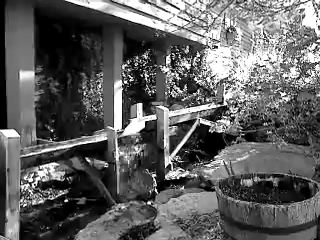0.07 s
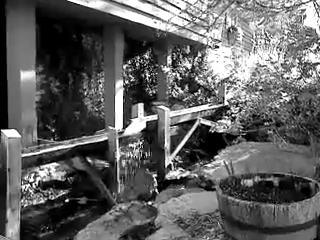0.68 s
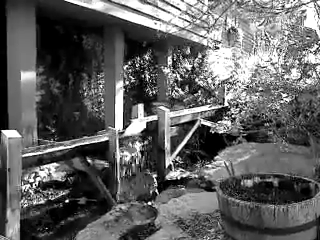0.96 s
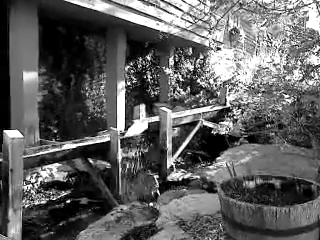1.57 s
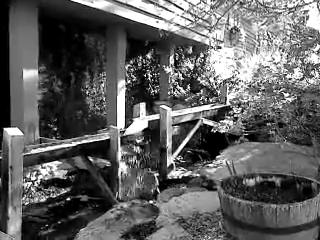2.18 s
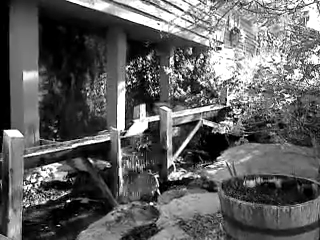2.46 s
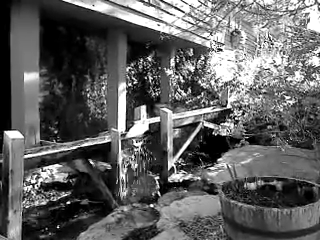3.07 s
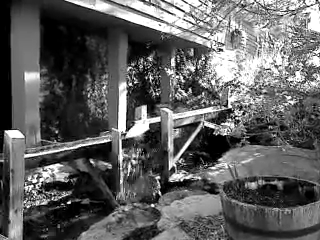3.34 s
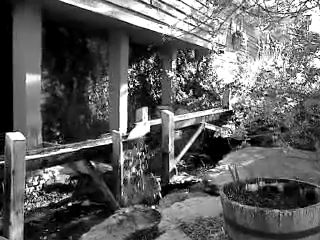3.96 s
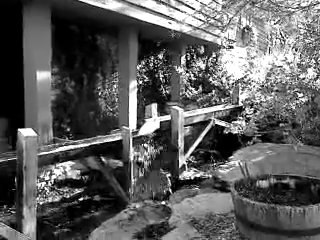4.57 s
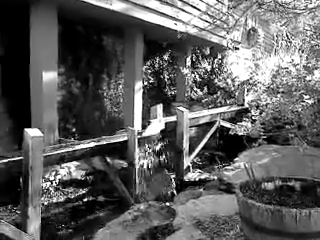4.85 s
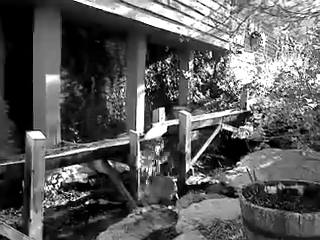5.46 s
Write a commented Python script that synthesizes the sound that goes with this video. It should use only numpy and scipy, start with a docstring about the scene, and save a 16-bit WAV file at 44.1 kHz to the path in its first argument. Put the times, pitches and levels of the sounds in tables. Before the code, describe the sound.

A steady, bright splashing of water falling onto stone and into a small pool, with scattered plinks and gurgles.

```python
"""A bright, steady spatter of water on rocks, pouring off the end of a wooden flume outdoors.
The sheet tears into lumps whose drops slap the stone; trapped air rings as bubbles in the runoff
and as low gulps in the pool. Behind it all the trough rumbles faintly.
Heard from a few metres away, on a small mono microphone with a bright resonance."""
import sys
import numpy as np
from scipy import signal
from scipy.fft import rfft, irfft
from scipy.io import wavfile
from scipy.ndimage import map_coordinates

SR = 44100
rng = np.random.default_rng(int(sys.argv[2]) if len(sys.argv) > 2 else 0)


def wav_record(signal):
    """Record a signal, one row per channel, as 16-bit PCM in the file named by sys.argv[1]."""
    frames = np.transpose(np.atleast_2d(signal))
    bounded = np.clip(frames, -1, 1)
    # unit amplitude maps onto the largest positive 16-bit level
    quanta = np.round(bounded * 32767).astype(np.int16)
    wavfile.write(sys.argv[1], SR, quanta)


N = 252693
TIME = np.arange(N) / SR


# Tone of the spatter on the rocks below the flume: (frequency [Hz], relative level [dB])
SPATTER_SPECTRUM = [(150, -32), (700, -15.5), (2000, -4.5), (2700, -10), (3050, -3), (3500, -1.5),
                    (4000, -3), (4550, 2), (5000, 1.5), (6000, -0.5), (6850, -3.5), (7400, -12),
                    (8100, -21), (9000, -36)]

def spatter(lumps, volleys, impacts):
    """Drops crack on bare stone, tiny bubbles fizz and each volley throws up a puff of fine spray."""
    fizz = bubbles(lumps ** 2, per_s=1800, low_hz=2744, high_hz=7350, cycles=26.4, rise=0.059)
    spray = volleys * rng.standard_normal(N)
    return coloured(impacts + from_db(-5.5) * fizz + from_db(0.5) * spray, SPATTER_SPECTRUM)


def drops(flow, per_s, spread_db):
    """Drops strike the rocks: many small clicks and a few large ones; rms 1."""
    sizes = from_db(spread_db * np.minimum(rng.exponential(1, N), 4))
    polarity = rng.choice([-1, 1], N)
    landing = rng.random(N) < per_s / SR
    return unit_rms(sizes * polarity * flow * landing)


# Tone of the water running off the rocks: (frequency [Hz], relative level [dB])
RUNOFF_SPECTRUM = [(200, -34), (480, -9), (570, -8), (650, -3.5), (820, -1), (1000, -2), (1300, 2.5),
                   (1580, -0.5), (1830, 3), (2250, -1), (2700, -5.5), (3600, -40), (6000, -48)]

def runoff(lumps, impacts):
    """The film of water on the rocks bubbles, washes softly and is slapped by the drops."""
    ringing = bubbles(lumps, per_s=2000, low_hz=519, high_hz=2910, cycles=15.5, rise=0.11, spread_db=0.5)
    wash = rng.standard_normal(N)
    return coloured(ringing + from_db(6) * impacts + from_db(1.5) * wash, RUNOFF_SPECTRUM)


def bubble(hz, cycles, rise):
    """Trapped air rings, fading 60 dB over `cycles`; its pitch climbs as it nears the surface."""
    age = np.arange(int(cycles * SR / hz)) * hz / SR / cycles   # 0 to 1
    phase = 2 * np.pi * cycles * (age + rise * age ** 2 / 2)
    return from_db(-60 * age) * np.sin(phase)


def bubbles(flow, per_s, low_hz, high_hz, cycles, rise, spread_db=0):
    """Bubbles of all sizes, born more often when more water lands; rms 1."""
    out = np.zeros(N)
    chance = rng.random((int(per_s * N / SR), 4))
    births = np.interp(chance[:, 0], np.cumsum(flow) / np.sum(flow), TIME)
    for s, (_, pitch, strength, side) in zip(births, chance):
        hz = low_hz * (high_hz / low_hz) ** pitch
        height = np.sqrt(hz) * from_db(spread_db * min(-np.log(1 - strength), 4))
        add(out, s, np.sign(side - 0.5) * height * bubble(hz, cycles, rise))
    return unit_rms(out)


# Single fat drops on the rock: (time [s], relative level [dB], pitch [Hz])
FAT_DROPS = [(0.313, -11, 5430), (0.5859, -11.5, 5340), (0.7576, -4.5, 5070), (1.0781, -9, 5300),
             (1.7271, -6, 5390), (1.8748, -3.5, 4830), (2.222, -3.5, 4550), (2.7702, -5.5, 5150),
             (4.3781, -4.5, 5620), (4.7208, -8.5, 5270), (5.467, -6.5, 4930)]

def slaps(cycles, spread_s, level_db):
    """A fat drop hits the wet stone with one short bright plink."""
    out = np.zeros(N)
    for s, db, hz in FAT_DROPS:
        plink = bubble(hz, cycles, rise=0)
        flattening = 1 - np.exp(-np.arange(len(plink)) / SR / spread_s)   # the drop spreads out
        add(out, s + 0.001, from_db(db + level_db) * plink * flattening)
    return out


# Single large bubbles among the rocks: (time [s], relative level [dB], pitch [Hz])
LARGE_BUBBLES = [(0.347, -13.5, 1880), (0.567, -13, 1380), (1.244, -14, 1740), (1.298, -13, 1250),
                 (2.079, -17.5, 1715), (2.201, -15, 1294), (2.448, -13.5, 1230), (3.634, -17.5, 642),
                 (4.028, -16.5, 1670), (5.306, -19.5, 1370), (5.356, -14.5, 890), (5.488, -14.5, 1160)]

def plops(cycles, rise, level_db):
    """Now and then one bubble rings out above the runoff."""
    out = np.zeros(N)
    for s, db, hz in LARGE_BUBBLES:
        add(out, s, from_db(db + level_db) * bubble(hz, cycles, rise))
    return out


# Tone of the pool under the flume: (frequency [Hz], relative level [dB])
POOL_SPECTRUM = [(90, -22.5), (142, -13.5), (195, -2.5), (245, -1), (295, -1), (340, 1.5), (410, 1),
                 (480, -6.5), (600, -8.5), (900, -38.5)]

def pool(lumps):
    """The stream plunges into the pool: big air pockets gulp over a soft churning."""
    gulps = bubbles(lumps, per_s=420, low_hz=150, high_hz=615, cycles=13, rise=0.14)
    churn = rng.standard_normal(N)
    return coloured(gulps + from_db(2.5) * churn, POOL_SPECTRUM)


# How much water runs over the rocks: (time [s], relative level [dB])
ROCK_FLOW = [(0.1, -27.8), (0.4, -28), (0.85, -29), (1.33, -27.5), (1.88, -28.5), (2.1, -27.5),
             (2.35, -28.5), (3.12, -27), (3.4, -29), (3.67, -27.3), (4.4, -29.0), (4.8, -27), (5.45, -28),
             (5.7, -29)]
# Heavy lumps plunging into the pool: (time [s], pool rise [dB])
POOL_PLUNGES = [(0.13, 3), (0.36, 6), (1.4, 3), (1.48, 5.5), (2.0, 3), (2.59, 6), (2.74, 2.5), (3.12, 7),
                (3.65, 4.5), (4.72, 3), (5.15, 5), (5.63, 6.5)]
# Heavy lumps bursting on bare stone: (time [s], spatter rise [dB])
STONE_BURSTS = [(0.09, 2), (0.225, 2.5), (0.755, 1), (1.42, 2), (1.875, 2.2), (2.46, 1.5), (2.77, 2),
                (3.14, 2), (3.495, 4.3), (3.955, 3), (4.5, 1.7), (5.475, 2)]
# The sheet tears open and less water lands: (time [s], runoff and spatter change [dB])
SHEET_LULLS = [(0.85, -2), (1.92, -2.5), (2.83, -0.6), (3.55, -0.8), (4.27, -1.5), (4.61, -1)]

def falling_sheet(sway_per_s):
    """The sheet sways between pool and stone, with lumps and lulls; the three layers' levels in dB."""
    flow_db = np.interp(TIME, *np.transpose(ROCK_FLOW))
    swing = flow_db - flow_db.mean()
    plunges = swells(POOL_PLUNGES, attack_s=0.023, release_s=0.04)
    bursts = swells(STONE_BURSTS, attack_s=0.022, release_s=0.017)
    lulls = swells(SHEET_LULLS, attack_s=0.038, release_s=0.024)
    washover = 0.2 * plunges   # part of each plunge spills into the runoff
    pool_db = -44.5 + 0.63 * swing + plunges + 1.3 * lulls + 0.9 * drift(sway_per_s)
    runoff_db = -28.5 + 0.85 * swing + washover + lulls + 0.31 * drift(sway_per_s)
    spatter_db = -23.5 + bursts + lulls + 0.45 * drift(sway_per_s)
    return pool_db, runoff_db, spatter_db


# Ground, posts and house wall as heard at the microphone: (delay [s], level re direct sound [dB])
REFLECTIONS = [(.0031, -13.5), (0.0117, -13), (.0187, -16.5), (.033, -15.5)]

def yard(direct, wander_s):
    """A few early reflections; their paths shift as the water lands now here, now there."""
    out = direct.copy()
    for delay_s, db in REFLECTIONS:
        delayed_index = (TIME - delay_s - wander_s * drift(9.07)) * SR
        out += from_db(db) * map_coordinates(direct, [delayed_index], order=3)
    return unit_rms(out) * np.std(direct)


# Tone of the flume itself, in the background: (frequency [Hz], relative level [dB])
TROUGH_SPECTRUM = [(20, -17.5), (45, -10), (70, -7.5), (92, 0), (114, 2), (140, -3), (200, -7.5), (400, -8),
                   (900, -31.5)]

def trough(level_db):
    """Water running down the wooden trough rumbles steadily."""
    return from_db(level_db) * coloured(rng.standard_normal(N), TROUGH_SPECTRUM)


def from_db(db):
    """Decibels to gain."""
    return 10 ** (np.asarray(db) / 20)


def unit_rms(x):
    """Scale to rms 1."""
    return x / np.sqrt(np.mean(x ** 2) + 1e-20)


def add(out, s, sound):
    """Mix a short sound in at time s."""
    at = int(np.clip(s * SR, 0, N - 1))
    out[at:at + len(sound)] += sound[:N - at]


def swells(rows, attack_s, release_s):
    """Each row raises or lowers the level in a rounded swell; dB, sample by sample."""
    return sum(db * np.exp(-((TIME - s) / np.where(TIME < s, attack_s, release_s)) ** 2 / 2)
               for s, db in rows)


def drift(rate):
    """Smooth random wander of spread 1, about `rate` turns a second."""
    hop, settle = 40, 2000
    pole = np.exp(-2 * np.pi * rate * hop / SR)
    noise = rng.standard_normal(N // hop + settle + 2)
    slow = signal.lfilter([1], [1, -2 * pole, pole * pole], noise)[settle:]
    return np.interp(np.arange(N) / hop, np.arange(len(slow)), unit_rms(slow))


def coloured(x, spectrum, size=4096):
    """Causal (minimum-phase) filter with the given spectrum; rms 1."""
    hz, db = np.transpose(spectrum)
    half = size // 2
    grid_hz = np.maximum(np.arange(half + 1) * SR / size, 1)
    gain = from_db(np.interp(np.log(grid_hz), np.log(hz), db))
    cepstrum = irfft(np.log(gain))[:half]
    cepstrum[1:] *= 2   # fold onto positive time
    response = irfft(np.exp(rfft(cepstrum, size)))
    return unit_rms(signal.fftconvolve(x, response[:half])[:N])


def scene():
    """Lumps of water land unevenly below the flume, bursting into quick volleys of drops."""
    pool_db, runoff_db, spatter_db = falling_sheet(sway_per_s=14)
    lumps = from_db(0.7 * drift(28))
    volleys = from_db(0.65 * drift(360))
    impacts = drops(lumps * volleys, per_s=11000, spread_db=2.5)
    water = from_db(pool_db) * pool(lumps)
    water += from_db(runoff_db) * runoff(lumps, impacts)
    water += from_db(spatter_db) * spatter(lumps, volleys, impacts)
    water += slaps(cycles=28, spread_s=0.00019, level_db=0.5)
    water += plops(cycles=41, rise=0.11, level_db=-5)
    rumble = trough(level_db=-51.5)
    return np.tile(yard(water, wander_s=0.000403) + rumble, (2, 1))


def record(dry):
    """A small microphone a few metres off: its port rings, the sound fades in fast, the top is cut."""
    port_hz, width_hz, port_gain = 5486, 536, 1.33
    start_s, fade_s, cutoff_hz = 0.073, 0.0097, 9800
    pole = np.exp(-np.pi * width_hz / SR)
    feedback = [1, -2 * pole * np.cos(2 * np.pi * port_hz / SR), pole * pole]
    port = signal.lfilter(np.array([1, 0, -1]) * (1 - pole * pole) / 2, feedback, dry)
    fade_in = np.clip((TIME - start_s) / fade_s + 0.5, 0, 1)
    top_cut = signal.cheby2(16, 70, cutoff_hz, fs=SR, output="sos")
    return signal.sosfilt(top_cut, (dry + port_gain * port) * fade_in)


dry = scene()
out = record(dry)
wav_record(out)
```